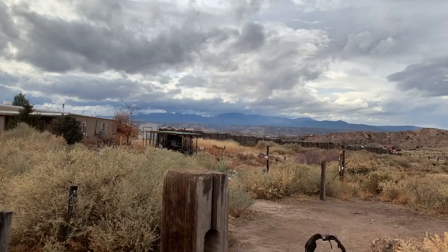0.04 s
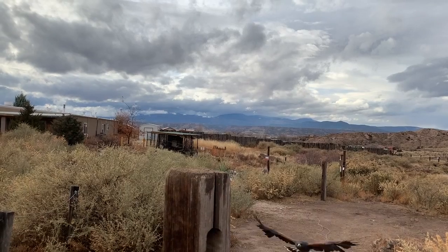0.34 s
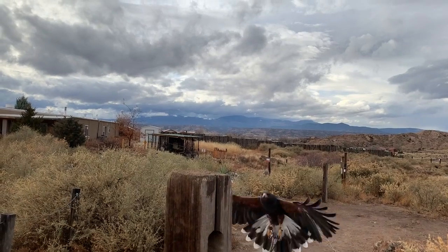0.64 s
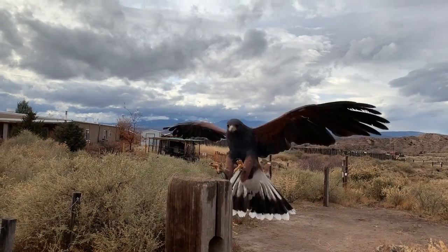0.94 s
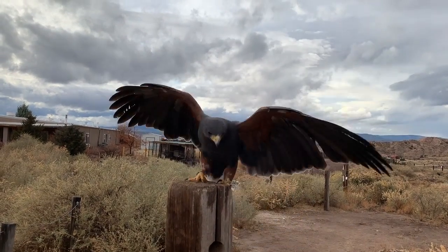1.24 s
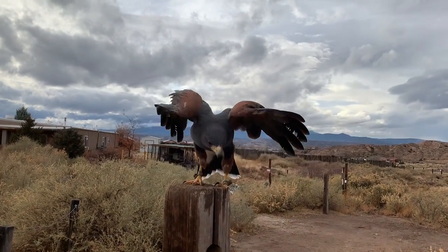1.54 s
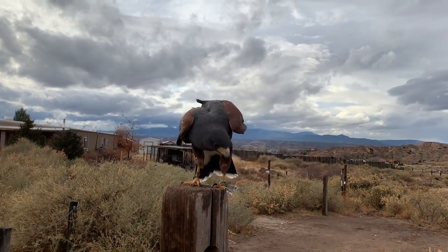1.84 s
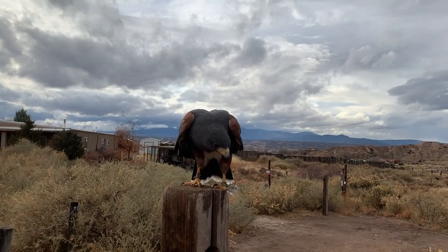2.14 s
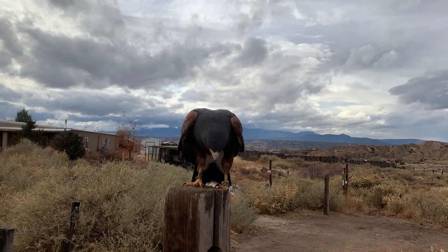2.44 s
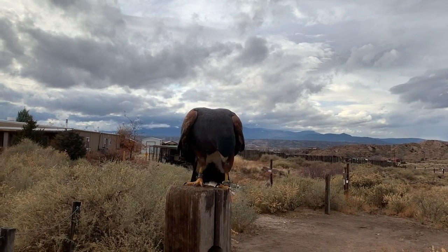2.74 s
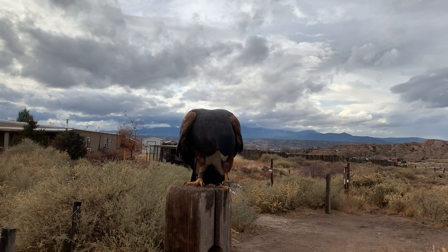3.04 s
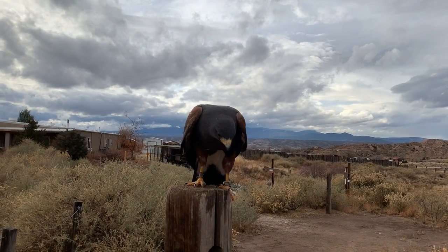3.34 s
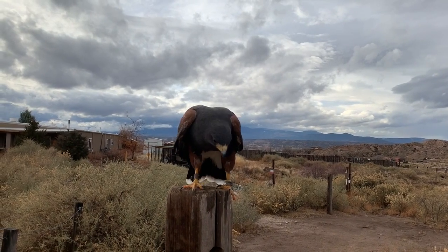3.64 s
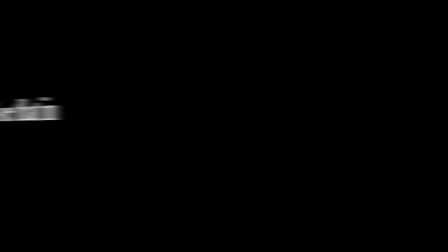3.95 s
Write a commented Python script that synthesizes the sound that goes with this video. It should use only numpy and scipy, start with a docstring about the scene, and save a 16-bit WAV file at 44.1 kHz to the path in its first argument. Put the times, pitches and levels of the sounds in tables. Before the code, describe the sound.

A hawk flies up close with feathery swishes and low puffs of air against the microphone. At about 1.1 seconds it lands on a wooden post with a sharp knock, talons scraping until 1.3. More wingbeats follow, the wings fold near 1.8, and light rustles and scratches continue. Steady wind and a faint distant engine run underneath; a songbird chirps briefly at 0.4 and 2.3 seconds.

```python
"""Open scrub in a steady wind, a stereo microphone right in front of a wooden post. A hawk flaps up from
the ground, feather swishing on feather, its wings pushing air against the microphone. It lands: its feet
knock and ring the wood, its talons scrape for grip, its wings rustle as they fold. Out in the scrub a small
songbird whistles two trilled calls, and far away an engine drones through its exhaust."""
import sys
import numpy as np
from scipy import signal
from scipy.fft import rfft, irfft, next_fast_len
from scipy.io import wavfile
from scipy.ndimage import uniform_filter1d, map_coordinates

SR = 44100
rng = np.random.default_rng(int(sys.argv[2]) if len(sys.argv) > 2 else 0)


def wav_out(sig):
    """Save sig, one row per channel (or a flat mono array), as 16-bit PCM at SR to the path in sys.argv[1]."""
    wavfile.write(sys.argv[1], SR, np.round(np.clip(np.atleast_2d(sig).T, -1, 1) * 32767).astype(np.int16))


N = 176400
TIME = np.arange(N) / SR


def amp(db):
    """Decibels to gain."""
    return 10 ** (np.asarray(db) / 20)


def unit(x):
    """Scale to rms 1."""
    return x / np.sqrt(np.mean(x ** 2) + 1e-20)


def along(points, hz):
    """Read (frequency, value) points on a log axis."""
    f, v = np.transpose(points)
    return np.interp(np.log(hz + 1), np.log(f + 1), v)


def curves(rows, start=0):
    """One value per sample for each column after the time."""
    s, *cols = np.transpose(rows)
    return [np.interp(TIME - start, s, c) for c in cols]


def wobble(rate):
    """A smooth random curve, rate knots a second."""
    return map_coordinates(rng.standard_normal(int(N * rate / SR) + 4), [TIME * rate])


def filtered(x, response):
    """Filter x by a complex response of frequency."""
    m = next_fast_len(N + SR // 2)
    return irfft(rfft(x, m) * response(np.fft.rfftfreq(m, 1 / SR)), m)[..., :N]


# likeness of the microphone's two channels (frequency [Hz], correlation [0-1])
CORRELATION = [(150, .86), (3000, .8), (6000, .78), (8500, .96)]
def noise(spectrum, tilt_db=0):
    """Coloured stereo noise of rms 1, mostly alike left and right; tilt per octave."""
    def response(hz):
        turn = np.arccos(np.clip(along(CORRELATION, hz), -1, 1)) / 2
        return amp(along(spectrum, hz) + tilt_db * np.log2(hz + 1)) * [np.cos(turn), np.sin(turn)]
    mid, side = unit(filtered(rng.standard_normal((2, N)), response))
    return unit(np.array([mid + side, mid - side]))


def steadied(x, window_s):
    """Noise with its slow chance swells evened out."""
    power = uniform_filter1d(np.mean(x ** 2, 0), int(window_s * SR))
    return x / np.sqrt(np.abs(power) + 1e-6)


def patchy(x, depth_db):
    """Narrow bands swell and fade on their own, as far sounds do in moving air."""
    bands = signal.stft(x, nperseg=2048)[2]
    swell = uniform_filter1d(rng.standard_normal(bands.shape[1:]), size=3, axis=0)
    swell = unit(uniform_filter1d(swell, size=7, axis=1))
    return unit(signal.istft(bands * amp(depth_db * swell), nperseg=2048)[1][:, :N])


def burst(start, t60, rise_s=0.00029):
    """Envelope with a quick rise and an exponential decay."""
    t = np.clip(TIME - start, 0, 1)
    return (1 - np.exp(-t / rise_s)) * np.exp(-np.log(1000) * t / t60)


def scatter(x, t60):
    """Diffuse echo from bushes and ground, different in each channel."""
    t = np.arange(SR // 2) / SR
    tail = rng.standard_normal((2, len(t))) * np.exp(-np.log(1000) * t / t60)
    return signal.fftconvolve(np.atleast_2d(x), tail / np.linalg.norm(tail[0]), axes=1)[:, :N]


# wind out in the scrub (frequency [Hz], level [dB])
RUSH_SPECTRUM = [(120, -34), (200, -6.5), (448, -1.5), (916, -2.5), (986, 1), (1180, -3.5), (2560, -28),
                 (3970, -46.5), (9500, -40.5), (16000, -51)]
# gusts and wingbeats swelling at the microphone (time [s], half-width [s], level [dB])
AIR_SWELLS = [(0.194, 0.056, -40.5), (0.352, 0.012, -42), (.57, 0.043, -41.5), (.8, 0.072, -40.5),
              (0.951, 0.036, -42), (1.082, 0.02, -40.5), (1.39, 0.1, -40), (1.59, 0.099, -40.5),
              (2.78, 0.1, -41), (3.53, 0.094, -44.5)]
# buffeting on the microphone (frequency [Hz], level [dB])
BUFFET_SPECTRUM = [(15, -32.5), (40, -1.5), (58, 3), (85, -0.5), (115, -7.5), (170, -18), (3000, -110)]
def wind(rush_db=-54.5, calm_db=-51):
    """A steady rush in the scrub, with low swells of buffeting at the microphone."""
    rush = amp(rush_db + wobble(6.71)) * patchy(noise(RUSH_SPECTRUM), depth_db=2.5)
    swell_power = sum(amp(db) ** 2 * np.exp(-((TIME - s) / width) ** 2) for s, width, db in AIR_SWELLS)
    buffet = steadied(noise(BUFFET_SPECTRUM), window_s=0.076)
    return rush + np.sqrt(amp(calm_db) ** 2 + swell_power) * buffet


# the engine, far off (time [s], firing rate [Hz])
FIRING_RATE = [(.1, 52.33), (.8, 57.64), (1.75, 75.58), (2.1, 79.28), (2.9, 82.3)]
# its exhaust, booming near 80 Hz (frequency [Hz], level [dB])
EXHAUST_SPECTRUM = [(60, -68), (75, -60.5), (80, -48.5), (90, -67.5), (120, -65), (205, -66), (232, -62.5),
                    (246, -76.5)]
def engine():
    """A far engine speeds up and holds; its orders cross the exhaust's resonances and waver in the wind."""
    hz, = curves(FIRING_RATE)
    phase = 2 * np.pi * np.cumsum(hz * (1 + 0.0028 * wobble(8))) / SR
    return np.sqrt(2) * sum(amp(along(EXHAUST_SPECTRUM, k * hz) + 1.2 * wobble(4.53)) * np.sin(k * phase)
                            for k in (1, 2, 3))


# hiss of the flight up to the post (time [s], level [dB])
HISS_LEVEL = [(.1, -71), (1.0, -74.5), (1.15, -68), (1.42, -88.5)]
# its colour (frequency [Hz], level [dB])
HISS_SPECTRUM = [(1000, -14), (8000, 0), (10000, -10), (16000, -23.5)]
# feather strokes, close by (peak time [s], rise [s], fall [s], level [dB], tilt [dB/octave])
FEATHER_STROKES = [(0.176, 0.014, 0.02, -57, 0.5), (0.345, 0.0034, 0.04, -49.5, -3),
                   (1.035, 0.02, 0.027, -58.5, -6.5), (1.25, 0.073, 0.085, -73, -10),
                   (1.468, .025, 0.035, -64.5, 2), (2.072, 0.05, 0.017, -67.5, -2.5),
                   (2.332, 0.0074, 0.035, -53.5, -6.5), (2.43, 0.024, 0.061, -76.5, 1.5),
                   (3.435, 0.013, 0.041, -73, -1.5), (3.48, 0.039, 0.075, -75, 17),
                   (3.625, 0.031, 0.12, -72, -3)]
# their colour before the tilt (frequency [Hz], level [dB])
FEATHER_SPECTRUM = [(400, -28.5), (1400, 1), (2500, 3), (3400, -2.5), (7000, -3), (9000, -4),
                    (11000, -17.5), (16000, -26.5)]
def feathers(grain_db=2.2):
    """Grainy swishes of feather on feather, over a thin hiss during the flight."""
    out = amp(curves(HISS_LEVEL)[0] + 0.22 * wobble(25)) * noise(HISS_SPECTRUM)
    for s, rise, fall, db, tilt_db in FEATHER_STROKES:
        below_peak_db = 10 * np.maximum((s - TIME) / rise, (TIME - s) / fall)
        out += amp(db - below_peak_db) * noise(FEATHER_SPECTRUM, tilt_db)
    return out * amp(grain_db * wobble(400))


# calls from the scrub (time [s], level [dB])
CALLS = [(.357, -54), (2.257, -60.5)]
# one call (time into the call [s], pitch [Hz], relative level [dB])
CALL_SHAPE = [(0, 3000, -23), (.010, 3500, -11), (.014, 4660, -8), (.017, 4910, -43), (.029, 4850, -14),
              (.035, 4480, -2), (.048, 4230, -1), (.062, 4030, -0.5), (.068, 3900, -29), (.078, 2980, -9),
              (.09, 3130, -3), (.108, 3480, -3), (.113, 3370, -14), (.129, 3180, -5), (.138, 3150, -30)]
# low notes are raspier (pitch [Hz], trill depth [0-1])
TRILL_DEPTH = [(3200, 0.3), (4300, 0.1)]
def songbird(trill_hz=180, flutter_db=3.5):
    """A flick up, a falling whistle and a lower trilled arch, echoing off the bushes."""
    song = np.zeros(N)
    for s, call_db in CALLS:
        hz, db = curves(CALL_SHAPE, s)
        trill = along(TRILL_DEPTH, hz) * np.sin(2 * np.pi * trill_hz * TIME + 0.35 * wobble(54))
        sounding = (TIME > s) & (TIME < s + CALL_SHAPE[-1][0])
        phase = 2 * np.pi * np.cumsum(hz * (1 + 0.04 * trill + 0.0095 * wobble(180))) / SR
        gain = amp(call_db + db + flutter_db * wobble(trill_hz))
        song += sounding * gain * (1 + trill) * np.sin(phase)
    return song + amp(-7.5) * scatter(song, t60=0.19)


# wing air right on the microphone (time [s], level [dB], frequency [Hz], rise and decay [s])
AIR_PUSHES = [(.745, -28, 78, .012), (.83, -33, 60, .012), (1.291, -29, 98, .009), (1.331, -28.5, 88, .008),
              (1.437, -39, 270, .004), (1.446, -30, 100, .008), (1.604, -35, 100, .012),
              (2.76, -34, 85, .02), (2.834, -35, 92, .013), (2.905, -41, 150, .008)]
# turbulence in a push (frequency [Hz], level [dB])
EDDY_SPECTRUM = [(60, -0.5), (160, -2), (520, -21), (4000, -105)]
def wing_puffs(eddy_db=-11, eddy_db_per_octave=7, skew_db=-1.7):
    """Each push of air swings the pressure at the microphone once or twice and breaks into eddies."""
    eddies, out = noise(EDDY_SPECTRUM), 0
    for s, db, hz, decay_s in AIR_PUSHES:
        rough = amp(eddy_db + eddy_db_per_octave * np.log2(hz / 100)) * eddies
        swing = np.cos(2 * np.pi * hz * (TIME - s))
        gains = amp(db + skew_db * rng.standard_normal((2, 1)))  # strikes left and right unequally
        out = out + gains * np.exp(-np.abs(TIME - s) / decay_s) * (rough - swing)
    return out


# modes of the post (frequency [Hz], bandwidth [Hz], level [dB])
POST_MODES = [(477, 27, -5), (732, 43, 5.5), (988, 45, -9.5), (1320, 54, 4.5), (1750, 89, -4),
              (2042, 97, -6.5), (2607, 45, -9), (3140, 45, -13.5), (3440, 63, -9.5), (4360, 150, -17.5)]
def post_ring(start, from_edge_m=0, bending_m_per_s=270):
    """The wood's ring after one touch; a mode stays weak when the foot lands near its node."""
    t = np.arange(SR // 4) / SR
    ring = 0
    for k, (hz, width, db) in enumerate(POST_MODES):
        coupling = (-1) ** k * np.cos(2 * np.pi * hz * from_edge_m / bending_m_per_s)
        ring = ring + coupling * amp(db) * width * np.exp(-np.pi * width * t) * np.sin(2 * np.pi * hz * t)
    return np.interp(TIME - start, t, 2 * ring / np.abs(ring).max(), left=0, right=0)


# feet landing just in front of the microphone (time [s], wood [dB], click [dB], distance from edge [m])
FOOTFALLS = [(1.1105, -43, -54, 0.045), (1.115, -34, -45.5, 0.06), (1.1213, -39.5, -31, 0.035),
             (1.1247, -29, -40.5, 0.0036), (1.1375, -42, -55, 0.048)]
# dense thud of the wood (frequency [Hz], level [dB])
THUD_SPECTRUM = [(170, 7), (400, -2), (700, -21.5), (1050, 3), (1550, -10), (2000, -3.5), (2600, -23.5),
                 (12000, -50)]
# click of a talon (frequency [Hz], level [dB])
CLICK_SPECTRUM = [(500, -21.5), (2000, -21), (3500, -10), (5500, -1), (10600, 0.5), (12500, -3.5),
                  (16000, -23)]
# soft shifts of the feet (time [s], level [dB])
FOOT_SHIFTS = [(1.588, -49.5), (1.614, -47.5)]
def feet(pad_hz=764):
    """Pads, then talons, hit the post with a ring, thud and click; later the feet shift softly."""
    ring = sum(amp(db) * post_ring(s, from_edge_m) for s, db, _, from_edge_m in FOOTFALLS)
    thud_envelope = sum(amp(db) * burst(s, t60=0.054) for s, db, _, _ in FOOTFALLS)
    thud = amp(-10) * noise(THUD_SPECTRUM) * thud_envelope
    click_power = sum((amp(db) * burst(s, t60=0.014)) ** 2 for s, _, db, _ in FOOTFALLS)
    click = noise(CLICK_SPECTRUM) * np.sqrt(click_power)
    shifts = sum(amp(db) * post_ring(s) for s, db in FOOT_SHIFTS)
    # a soft pad excites mainly the low modes
    padded = filtered(shifts, lambda hz: 1 / (1 + 1j * hz / pad_hz - (hz / pad_hz) ** 2))
    direct = ring + thud + click + padded
    return direct + amp(-22) * scatter(direct, t60=0.16)


# talons slipping on the post, close up (time [s], level [dB])
SLIPS = [(1.185, -51.5), (1.2339, -50), (1.238, -53), (1.2465, -53), (1.268, -55), (1.2712, -60),
         (1.282, -52.5), (1.288, -57), (1.3197, -50.5), (2.859, -65.5), (2.962, -66), (3.535, -61)]
# claw on wood (frequency [Hz], level [dB])
SCRAPE_SPECTRUM = [(800, -17.5), (2100, 5.5), (2600, 7.5), (4400, -2), (8000, -28), (16000, -45)]
def talons(drag_db=-14, drag_s=0.011):
    """The claws drag over the grain and slip in short jerks as they find their grip."""
    power = 0
    for s, db in SLIPS:
        drag_power = amp(drag_db) ** 2 * np.exp(-((TIME - s) / drag_s) ** 2)
        power = power + amp(db) ** 2 * (burst(s, t60=0.021) ** 2 + drag_power)
    return noise(SCRAPE_SPECTRUM) * np.sqrt(power)


# wings closing, close up (frequency [Hz], level [dB])
FOLD_SPECTRUM = [(150, 8.5), (470, 7.5), (2500, -85)]
def wing_fold(at_s=1.755, width_s=0.031, db=-54.5):
    """A soft, dull brush as the wings settle against the body."""
    return amp(db) * np.exp(-((TIME - at_s) / width_s) ** 2 / 2) * noise(FOLD_SPECTRUM)


def arriving(x, phase):
    """Sound from one direction reaches the two sides of the microphone out of step."""
    return filtered(x, lambda hz: np.exp(1j * np.array([[.5], [-.5]]) * along(phase, hz)))


# arrival from the post (frequency [Hz], phase lead of left over right [rad])
FROM_POST = [(220, 0), (1300, 1.1), (2000, 5.6), (2600, 8.2), (4400, 8.5), (5600, 9.9), (7200, 9.1),
             (11500, 3.2), (14000, .2)]
# arrival from around it (frequency [Hz], phase lead of left over right [rad])
FROM_AROUND = [(250, 0), (550, 1.8), (1000, 2.4), (2300, 6), (2900, 4.8), (4400, 7.2), (5500, 4.4),
               (7300, 3), (11500, -3), (13300, -6.2)]
def scene():
    """The post close by; wings, wind and landscape around it."""
    on_post = feet() + talons()
    around = feathers() + wing_fold() + wing_puffs() + wind() + engine() + songbird()
    return arriving(on_post, FROM_POST) + arriving(around, FROM_AROUND)


# balance of the microphone (frequency [Hz], left over right [dB])
MIC_BALANCE = [(280, .2), (600, 1.6), (1300, .3), (5000, 0)]
def record(dry, start_s=0.0906, end_s=3.927, fade_s=0.0099, top_hz=15600):
    """Each channel has its own gain; the recorder starts, stops and limits the band."""
    channels = filtered(dry, lambda hz: amp(np.array([[.5], [-.5]]) * along(MIC_BALANCE, hz)))
    running = np.clip(np.minimum(TIME - start_s, end_s - TIME) / fade_s, 0, 1)
    return filtered(channels * running, lambda hz: hz < top_hz)


dry = scene()
out = record(dry)
wav_out(out)
```